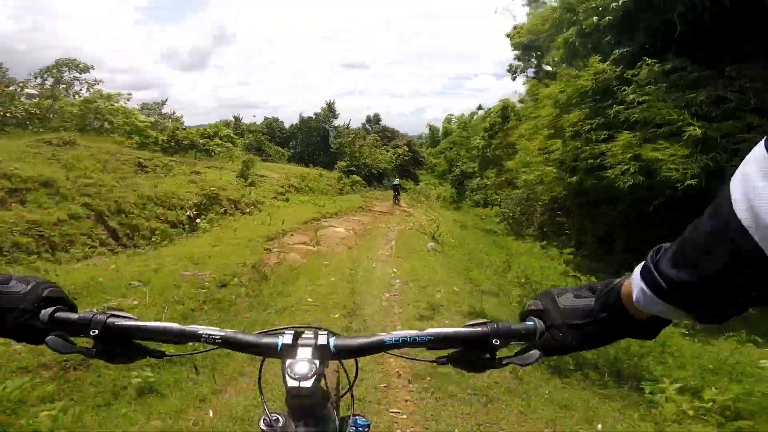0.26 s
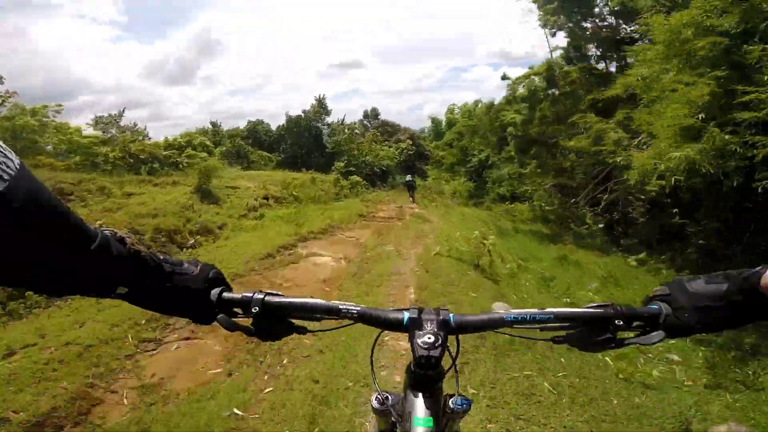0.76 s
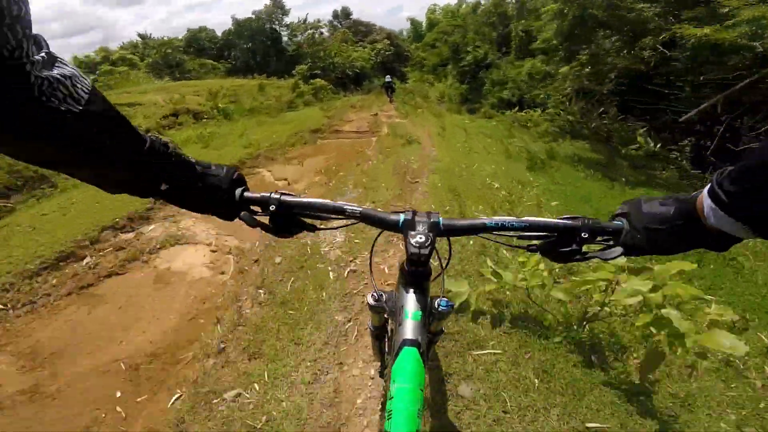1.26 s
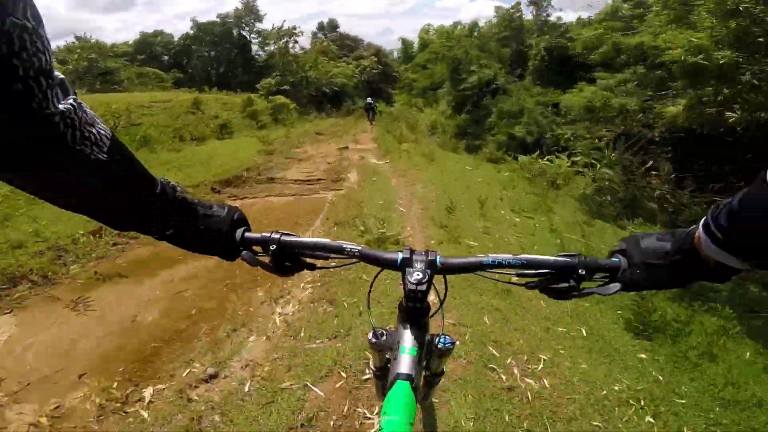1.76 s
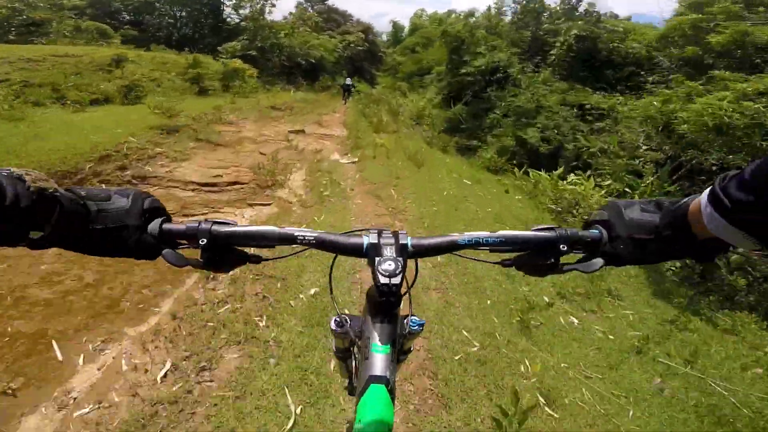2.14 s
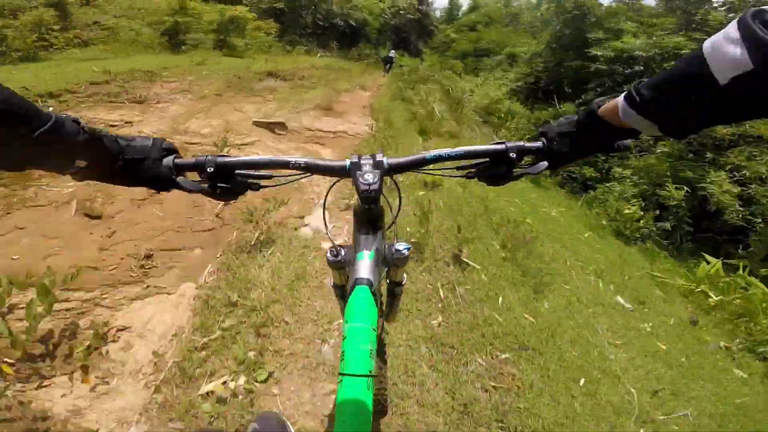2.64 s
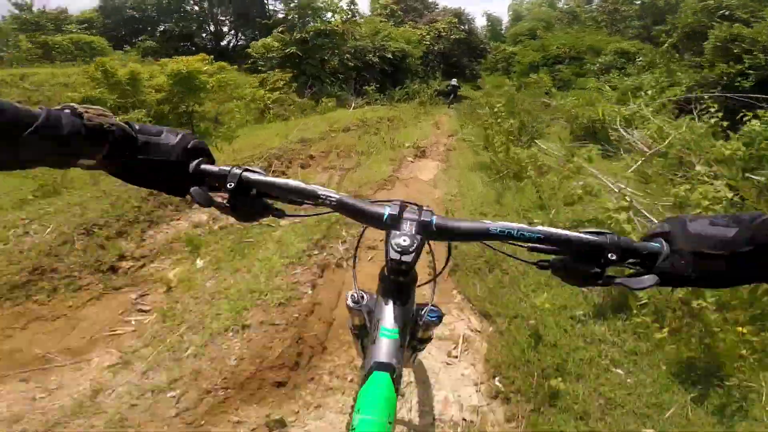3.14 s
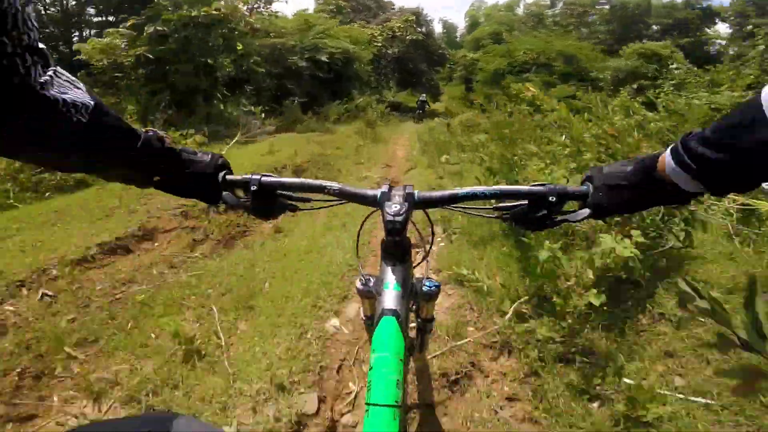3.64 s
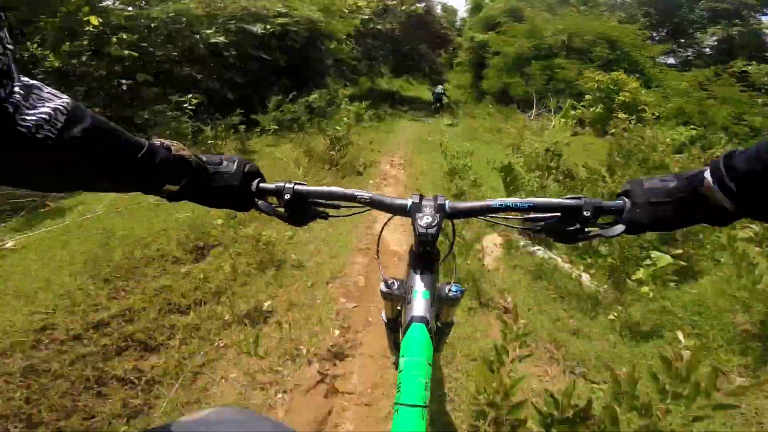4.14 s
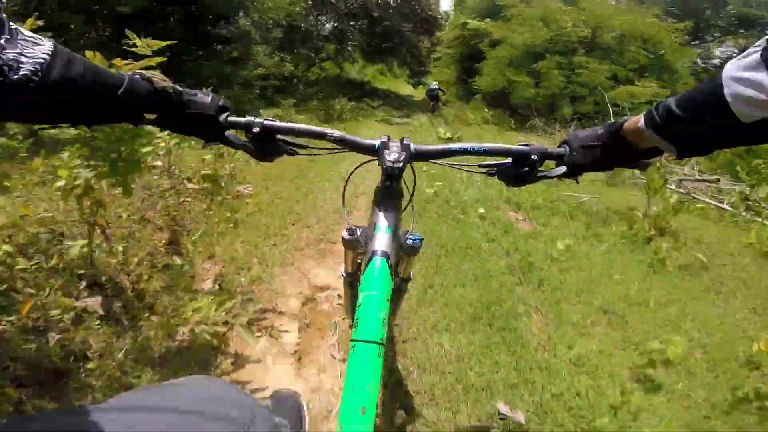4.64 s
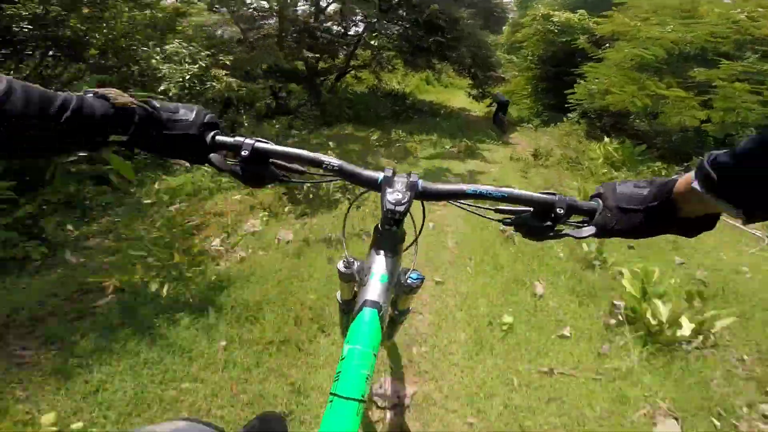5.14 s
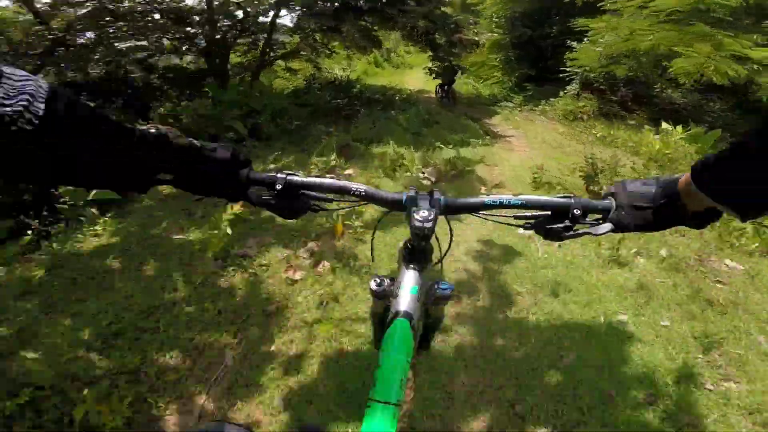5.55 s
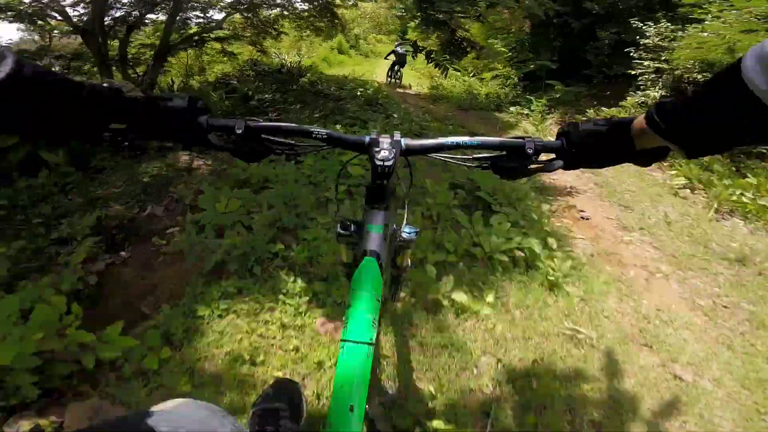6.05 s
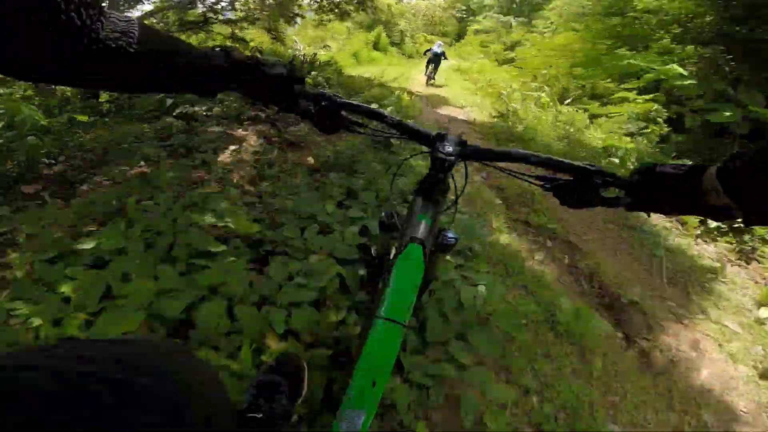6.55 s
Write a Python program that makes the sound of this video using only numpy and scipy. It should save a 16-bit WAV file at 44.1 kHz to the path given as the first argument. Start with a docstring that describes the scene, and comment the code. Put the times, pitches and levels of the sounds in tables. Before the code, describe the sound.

Gusty low wind buffets a close, slightly muffled microphone on a cyclist's chest outdoors. Tyres drone and crunch on dirt, flicking small stones, while the chain, cables and frame clack and knock. A strong thump lands about three seconds in, rattling clusters after four. Past five seconds the grit becomes finer and softer on grass, then weeds scrape and swish loudly with a burst of knocks at six and a half.

```python
"""On a bumpy dirt and grass trail a mountain bike rolls fast, heard at a microphone on the rider's chest.
Wind is shaped noise in slow pushes and quick eddies, with short sine swings for its pops.
Tyres are resonant noise: a drone, gritty crunch and grass swish, with pings of stones and stems.
Chain and cable slaps, scrapes and frame knocks are bursts that ring the microphone's housing;
the knocks ring the frame as well."""
import sys
import numpy as np
from scipy import signal
from scipy.fft import rfft, irfft, next_fast_len
from scipy.io import wavfile
from scipy.ndimage import uniform_filter1d, map_coordinates

SR = 44100
rng = np.random.default_rng(int(sys.argv[2]) if len(sys.argv) > 2 else 0)


def store_pcm(level_fs):
    """Save levels as 16-bit WAV."""
    pcm = np.round(np.clip(level_fs, -1, 1) * 32767).astype(np.int16)
    wavfile.write(sys.argv[1], SR, np.atleast_2d(pcm).T)


N = 299564

# Dirt gives way to grass: t/s, size of the grit (0-1)
STONINESS = [(0, 0.8), (4.9, 0.69), (5.1, 0.37), (6.79, 0.45)]
# Low resonances of the housing: f/Hz, width/Hz, gain/dB
HOUSING_LOW = [(1425, 1160, -3.5), (2117, 970, 1.5), (2780, 493, 3), (3158, 1120, -4.5)]
# High resonances of the housing: f/Hz, width/Hz, gain/dB
HOUSING_HIGH = [(5030, 880, 0), (6470, 380, 2), (7400, 1900, -8), (9800, 1750, -4.5), (13700, 12000, -10)]


def amp(db):
    """Decibels to linear gain."""
    return 10 ** (np.asarray(db) / 20)


def unit(x):
    """The signal scaled to rms 1."""
    return x / np.sqrt(np.mean(x ** 2) + 1e-20)


def curves(rows):
    """One automation curve, a value per sample, for each column after the time."""
    times, *columns = np.transpose(rows)
    return [np.interp(np.arange(N) / SR, times, column) for column in columns]


def wobble(rate):
    """A smooth random curve with rate knots a second."""
    knots = rng.standard_normal(int(N * rate / SR) + 4)
    return map_coordinates(knots, [np.arange(N) * rate / SR])


def filtered(x, response):
    """The signal filtered by a complex response of frequency."""
    size = next_fast_len(N + SR // 2)
    spectrum = rfft(x, size) * response(np.fft.rfftfreq(size, 1 / SR))
    return irfft(spectrum, size)[:N]


def coloured(x, points):
    """The signal equalised through (Hz, dB) points on a log frequency axis."""
    f, db = np.transpose(points)
    return filtered(x, lambda hz: amp(np.interp(np.log(hz + 1), np.log(f + 1), db)))


def resonant(x, modes):
    """The signal ringing through parallel (Hz, width Hz, dB) resonances of alternating sign."""
    def response(f):
        total = 0
        for k, (centre, width, db) in enumerate(modes):
            band = 1j * f * width / (centre * centre - f * f + 1j * f * width)
            total = total + (-1) ** k * amp(db) * band
        return total
    return filtered(x, response)


def grit(rate, spread_db, t60, patchy_db, bed):
    """Noise broken into small random bursts over a steady bed, in patches of varying pitch."""
    sizes = amp(spread_db * np.minimum(rng.exponential(size=N), 2.5))
    starts = (rng.random(N) < rate / SR) * sizes * curves(STONINESS)[0]
    decay = amp(-60 * np.arange(SR // 10) / SR / t60)
    shape = signal.fftconvolve(starts, decay)[:N]
    spectrum = signal.stft((bed + shape) * rng.standard_normal(N), nperseg=256)[2]
    # random gains, smoothed over frequency and then time
    patches = uniform_filter1d(rng.standard_normal(spectrum.shape), size=8, axis=0)
    patches = uniform_filter1d(patches, size=4, axis=1)
    return signal.istft(spectrum * amp(patchy_db * unit(patches)), nperseg=256)[1][:N]


def add(track, s, sound):
    """Mixes a sound into a track at s seconds."""
    part = track[round(s * SR):][:len(sound)]
    part += sound[:len(part)]


def wind():
    """Slow pressure pushes and lumpy eddies shed at the port; strong gusts add quicker eddies."""
    # Gusts: t/s, slow push level/dB, eddy level/dB
    gusts = [(0.0, -11.5, -20.5), (0.25, -29.5, -25.5), (0.42, -9.5, -25.5), (0.6, -17.5, -27),
             (0.8, -25, -31), (1.2, -20, -19), (1.62, -18, -26), (1.76, -16, -15.5), (1.9, -10.5, -25.5),
             (2.02, -21.5, -23), (2.5, -30, -22.5), (2.88, -10, -21), (3.16, -21, -12),
             (3.25, -20.5, -31.5), (3.55, -19.5, -16), (4.15, -25, -14), (4.56, -26, -12),
             (4.72, -10.5, -16), (5.02, -18.5, -13), (5.3, -17, -17.5), (6.15, -18, -17),
             (6.43, -12.5, -24.5), (6.58, -12.5, -12), (6.79, -23, -27)]
    # Colour of the slow pushes: f/Hz, gain/dB
    push_colour = [(8, -41), (18, 1.5), (32, -5.5), (50, -18.5), (80, -39), (200, -95)]
    # Colour of the eddies: f/Hz, gain/dB
    eddy_colour = [(25, -8.5), (55, 4.5), (100, 0), (160, -5), (300, -19), (600, -29), (1500, -89),
                   (4000, -92)]
    # Colour of the small quick eddies: f/Hz, gain/dB
    quick_colour = [(60, -3), (110, 3.5), (160, 3), (230, -8), (400, -50.5)]
    push_db, eddy_db = curves(gusts)
    push = unit(amp(1.6 * wobble(5.1)) * coloured(rng.standard_normal(N), push_colour))
    lumps = amp(0.34 * wobble(25) + 2.45 * wobble(70))  # shared by both sizes of eddy
    eddy = unit(coloured(lumps * rng.standard_normal(N), eddy_colour))
    quick = unit(coloured(lumps * rng.standard_normal(N), quick_colour))
    quick_db = -28 + 1.47 * (eddy_db - eddy_db.mean())  # swings wider than the eddies
    return amp(push_db) * push + amp(eddy_db) * eddy + amp(quick_db) * quick


def pebbles(count, hz, cycles, spread_db):
    """Flung stones and snapped stems: tiny decaying sine pings, each at its own pitch."""
    when, tone, size = rng.random((count, 3)).T
    pitch = hz * 2 ** (2.76 * (tone - .5))  # spread over 2.76 octaves
    t = np.arange(256) / SR
    pings = np.sin(2 * np.pi * np.outer(pitch, t)) * np.exp(-np.outer(pitch / cycles, t))
    pings *= amp(-spread_db * np.log(0.07 + size))[:, None]
    places = (when * N).astype(int)[:, None] + np.arange(256)
    return unit(np.bincount(places.ravel(), pings.ravel(), N + 256)[:N])


def tyres():
    """Ground contact drives the tyre drone, the crunch of dirt and the swish of grass as noise."""
    # Rolling: t/s, drone level/dB, crunch level/dB, swish level/dB
    rolling = [(0.0, -24.5, -42, -48), (0.25, -23, -41, -49.5), (0.6, -29.5, -42, -50),
               (0.95, -27.5, -34.5, -53), (1.3, -21.5, -35, -39.5), (1.66, -28, -38, -47.5),
               (1.85, -24, -34, -50), (2.3, -29.5, -39, -51.5), (2.6, -25.5, -36, -47.5),
               (2.91, -20.5, -32, -38), (3.14, -17, -30, -44), (3.22, -25.5, -34.5, -46),
               (3.61, -25.5, -39.5, -44), (4.1, -25, -35, -46), (4.6, -15.5, -27.5, -36),
               (4.75, -26, -31, -39.5), (5.07, -19.5, -37, -46), (5.12, -26, -35.5, -51),
               (5.22, -19.5, -33, -41), (5.255, -31, -40, -56), (5.3, -21, -36, -37),
               (5.56, -23.5, -28.5, -38.5), (5.62, -22.5, -35, -34.5), (5.79, -23.5, -31, -32.5),
               (6.33, -25, -26, -31.5), (6.5, -17.5, -23.5, -20.5), (6.79, -23.5, -24, -27.5)]
    # Resonances of tyre cavity and frame: f/Hz, width/Hz, gain/dB
    drone_modes = [(226, 20.9, 3.5), (336.3, 99, -4), (509, 177, -7.5), (1060, 650, -17.5)]
    drone_db, crunch_db, swish_db = curves(rolling)
    crunch_gain, swish_gain = amp(crunch_db), amp(swish_db)
    bumps = wobble(30)  # uneven ground shakes all three together
    stony, = curves(STONINESS)  # grass rolls more evenly than dirt

    drone_sway = amp(1.9 * bumps + 2.26 * wobble(60))
    drone = unit(drone_sway * resonant(rng.standard_normal(N), drone_modes))

    clumps = amp(1.6 * stony * bumps + 1.2 * wobble(16))
    dirt = clumps * grit(330, spread_db=3.6, t60=0.0072, patchy_db=3.5, bed=0.56)
    # harder crunching favours the upper resonances
    brighter = amp(0.093 * (crunch_db - crunch_db.mean()))
    lower, upper = resonant(dirt, HOUSING_LOW[:2]), resonant(dirt, HOUSING_LOW[2:])
    crunch = unit(lower / brighter + upper * brighter)

    stems = grit(160, spread_db=6.0, t60=0.013, patchy_db=2.5, bed=0.98)
    swish_sway = amp(stony * (1.8 * wobble(30) + 1.7 * bumps))
    swish = unit(swish_sway * resonant(stems, HOUSING_HIGH))

    tick_gain = amp(-7.5) * stony * np.sqrt(crunch_gain * swish_gain)
    ticks = tick_gain * pebbles(count=900, hz=5520, cycles=6.3, spread_db=2.5)
    stone_gain = amp(-8.5) * stony * crunch_gain
    stones = stone_gain * pebbles(count=1200, hz=1783, cycles=2.9, spread_db=7.0)
    return amp(drone_db) * drone + crunch_gain * crunch + swish_gain * swish + ticks + stones


def rattles():
    """Chain and cable slaps: short ragged noise bursts that ring both parts of the housing."""
    # The loud slaps: t/s, drive level/dB, dull part over it/dB, t60/s
    loud = [(0.134, -24, -17, 0.015), (0.146, -29, -2, .02), (0.207, -24, 3, .02), (0.168, -35, 10, .015),
            (0.278, -39, 15, .02), (0.486, -33, -10, 0.025), (0.855, -27.5, -1, 0.028),
            (0.911, -25, 14, .015), (0.946, -24, -1, 0.014), (0.9929, -19.5, -15, 0.025),
            (1.063, -43, 11, .014), (1.091, -28.5, 12, 0.011), (1.203, -20.5, -9, 0.014),
            (1.228, -24, -7, 0.032), (1.266, -21, 0, 0.057), (1.487, -28, 12, 0.024),
            (1.665, -23, 3, 0.017), (1.6856, -34, 2, 0.018), (1.752, -13.5, -13, 0.016),
            (1.8, -34, 11, 0.015), (1.837, -25, -3, 0.016), (1.915, -40, 19, 0.014), (1.923, -18, 6, 0.014),
            (1.944, -32, 8, .02), (1.97, -23.5, -8, 0.019), (2.371, -17.5, 3, 0.013), (2.396, -28, 4, .012),
            (2.406, -28, 3, .012), (2.552, -30.5, 4, 0.035), (2.635, -26, -3, 0.019),
            (2.707, -20.5, -3, 0.091), (2.731, -28, 15, 0.052), (2.745, -26, 3, 0.018),
            (2.868, -28, 15, .03), (2.884, -28, 18, 0.017), (2.8938, -18, -1, 0.054),
            (3.041, -22, 6, 0.078), (3.059, -31, 22, 0.012), (3.115, -21, 7, 0.027),
            (3.2212, -21, -10, 0.02), (3.309, -28, 4, 0.096), (3.3683, -30, 1, 0.098),
            (3.58, -32.5, 23, .016), (3.596, -18.5, -28, 0.12), (3.6155, -13, 4, 0.032),
            (3.736, -29.5, 18.5, 0.014), (3.763, -25, 6, 0.025), (4.1989, -28.5, -14, 0.11),
            (4.314, -16.5, -7, 0.037), (4.37, -25, -10, 0.053), (4.443, -23, 6, 0.073),
            (4.475, -23, 16, 0.015), (4.487, -24, 18, 0.014), (4.501, -19, 11, .03), (4.529, -18, 6, 0.023),
            (4.5472, -14.5, 5, 0.039), (4.566, -21, -2, 0.038), (4.591, -13.5, 3, 0.035),
            (4.621, -23, 19, 0.015), (4.645, -23, 3, 0.051), (4.664, -22, 14, 0.015),
            (4.68, -27, 11, 0.027), (4.729, -20.5, -13, 0.027), (4.786, -25, 6, 0.018),
            (4.805, -33, 18, 0.023), (4.821, -21, -9, 0.017), (4.859, -18, -15, .012),
            (4.875, -23, 9, 0.017), (4.898, -20, -2, 0.017), (4.9783, -28, -5, 0.034),
            (5.338, -28, -27, .01), (5.838, -20, -26, 0.025), (5.856, -29, 20, 0.033),
            (5.878, -16, 8.5, 0.064), (5.931, -25, 13.5, 0.045), (5.999, -31, 6, 0.025),
            (6.0203, -24, 18, 0.017), (6.035, -20, -10, 0.046), (6.138, -27, 7, 0.038),
            (6.2208, -23, -12, 0.16), (6.3614, -29, 9, 0.044), (6.467, -18, -4, 0.02),
            (6.64, -22, 1, 0.023), (6.692, -14.5, 14, 0.0075)]
    dull, bright, edge = np.zeros(N), np.zeros(N), np.zeros(N)
    t = np.arange(SR // 6) / SR
    # light slaps fall at random, 26 a second on average
    draws = rng.random((260, 2))
    light_times = np.cumsum(-np.log(draws[:, 0]) / 26)
    light_db = -32.5 - 4 * np.log(.15 + draws[:, 1])
    light = [(s, db, -3, 0.0076) for s, db in zip(light_times, light_db)]
    for s, db, dull_db, t60 in loud + light:
        shape = amp(db - 60 * t / t60) * (1 - np.exp(-t / 0.0012))
        add(bright, s, shape * rng.standard_normal(len(t)))
        add(dull, s, amp(dull_db) * shape * rng.standard_normal(len(t)))
        snap = amp(-0.4 * dull_db - 60 * t / .012)  # thin slaps snap harder
        add(edge, s, snap * shape * rng.standard_normal(len(t)))
    crack = amp(-8) * np.diff(edge, 2, prepend=[0, 0])  # the unresonant edge of each slap
    links = amp(2.0 * wobble(600))  # single links strike within a slap
    high = amp(10.5) * resonant(links * bright, HOUSING_HIGH)
    low = amp(11.5) * resonant(links * dull, HOUSING_LOW)
    return high + low + links * crack


def scrapes():
    """Tyres cut through loose grit and weeds: a sudden, finely grained rasp holds and trails off."""
    # Cuts through grit and weeds: t/s, hold/s, dull level/dB, bright level/dB
    cuts = [(0.141, 0.022, -30, -36.5), (0.252, 0.045, -36, -48), (1.67, 0.0084, -34, -49),
            (1.788, 0.021, -30.5, -48), (1.908, 0.014, -25.5, -53), (2.725, 0.015, -21, -26),
            (2.748, 0.039, -34, -33), (2.8, 0.035, -34, -40), (2.87, 0.023, -28, -31),
            (3.03, 0.067, -29, -35), (3.601, 0.019, -29, -36), (3.98, 0.021, -33.5, -37),
            (4.053, 0.082, -29.5, -32), (4.464, 0.042, -25, -30.5), (4.78, 0.023, -27.5, -33),
            (5.128, 0.068, -31, -58), (5.272, 0.03, -28.5, -38), (5.348, 0.096, -30, -51),
            (5.648, 0.026, -30.5, -39), (5.868, 0.043, -19, -22.5), (6.026, 0.023, -26, -26),
            (6.216, 0.027, -28.5, -30), (6.335, 0.086, -21.5, -26), (6.456, 0.057, -19.5, -43),
            (6.515, 0.021, -28, -22), (6.662, 0.063, -20, -24)]
    trail_t60_s = 0.15
    dull, bright, t = np.zeros(N), np.zeros(N), np.arange(SR // 3) / SR
    for s, length, dull_db, bright_db in cuts:
        attack = np.clip(t / 0.0013, 0, 1)
        shape = attack * amp(-60 * np.clip(t - length, 0, 1) / trail_t60_s)
        add(dull, s, amp(dull_db) * shape)
        add(bright, s, amp(bright_db) * shape)
    grain = amp(2.6 * wobble(300))
    coarse = grit(300, spread_db=-1.0, t60=0.0048, patchy_db=0.5, bed=1.0)
    fine = grit(300, spread_db=-6.0, t60=0.0034, patchy_db=0.5, bed=0.98)
    low = unit(grain * resonant(coarse, HOUSING_LOW))
    high = unit(grain * resonant(fine, HOUSING_HIGH))
    return dull * low + bright * high


def knocks():
    """Each bump jolts the frame raggedly; where it lands decides which modes speak."""
    # Bumps: t/s, strength/dB, pitch that the blow favours f/Hz
    blows = [(0.277, -13.5, 585), (1.092, -14.5, 760), (1.189, -16.5, 710), (1.681, -17, 1130),
             (1.795, -22, 1360), (2.096, -23, 584), (2.732, -17, 958), (2.866, -10.5, 875),
             (3.044, -16.5, 630), (3.157, -9.5, 684), (3.737, -21, 563), (3.894, -14.5, 600),
             (4.177, -19.5, 800), (4.353, -21, 676), (4.474, -13, 638), (4.501, -14.5, 649),
             (4.529, -17, 630), (4.62, -28, 794), (4.79, -10.5, 670), (4.805, -9, 736), (5.281, -20, 781),
             (5.42, -19, 624), (5.855, -23, 1390), (5.886, -13.5, 1380), (5.999, -23, 1020),
             (6.02, -15, 840), (6.137, -13, 885), (6.335, -14, 655), (6.36, -15.5, 640), (6.46, -22, 587),
             (6.51, -12, 915), (6.537, -8, 547), (6.562, -8.5, 640), (6.664, -12.5, 581)]
    # Modes of the knocked frame: f/Hz, width/Hz, gain/dB
    frame_modes = [(306, 92, 1), (508, 134, 3.5), (707, 500, -4), (968, 147, 0.5), (1340, 197, -10.5)]
    jolt_t60_s = 0.061
    jolts, t = np.zeros(N), np.arange(SR // 8) / SR
    for s, db, hz in blows:
        jolt = amp(-60 * t / jolt_t60_s) * (1 - np.exp(-t / 0.00055)) * rng.standard_normal(len(t))
        jolt[:12] += 3.07 * np.hanning(12)  # the first blow
        favour = signal.iirpeak(hz, 1 / 0.8, SR)  # band 0.8 of its pitch wide
        add(jolts, s, amp(db) * signal.lfilter(*favour, jolt))
    return amp(15.5) * resonant(jolts, frame_modes) + amp(8.0) * resonant(jolts, HOUSING_LOW)


def thumps():
    """A strong eddy hits the port as a short sine swing that slows down."""
    # Wind pops: t/s, envelope peak level/dB, final pitch f/Hz, extra quick cycles at the start
    pops = [(0.591, -9.5, 88, 0.54), (3.157, 0, 106.5, 2.7), (5.17, -5.5, 118, 1), (5.606, -3, 103, 1.3),
            (5.922, -3.5, 103, 0.95), (6.538, -9, 148, 0.83), (6.562, -6, 151, 2.85)]
    out, t = np.zeros(N), np.arange(SR // 10) / SR
    shape = amp(-60 * t / 0.051) * (1 - np.exp(-t / 0.011))
    for s, db, hz, quick in pops:
        phase = 2 * np.pi * (hz * t + quick * (1 - np.exp(-t / 0.0031)))
        add(out, s, amp(db) * shape / shape.max() * np.sin(phase))
    return out


def scene():
    """Everything sums at one microphone."""
    return (wind() + tyres() + rattles() + scrapes() + knocks() + thumps())[None]


def record(dry):
    """The port colours the sound; self-noise, soft clipping and a band limit follow."""
    # Colour of the microphone port: f/Hz, gain/dB
    port = [(100, -1), (3200, -6.5), (4150, -9.5), (5000, -7.5), (9800, -10), (11800, -25), (15000, -30)]
    full_scale, top_hz = .95, 15350
    x = coloured(dry[0], port) + amp(-67.0) * rng.standard_normal(N)
    x = x / (1 + (x / full_scale) ** 4) ** (1 / 4)
    return filtered(x, lambda hz: hz < top_hz)[None]


dry = scene()
out = record(dry)
store_pcm(out)
```